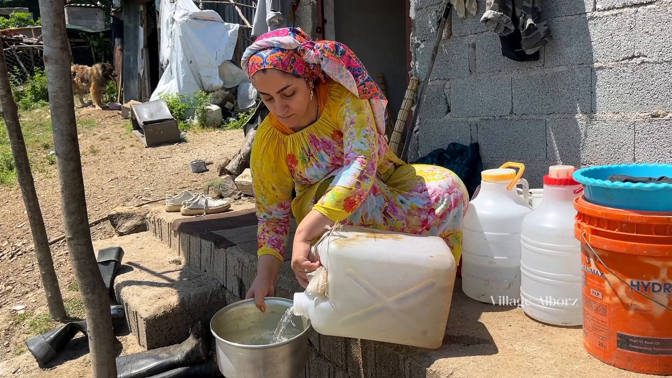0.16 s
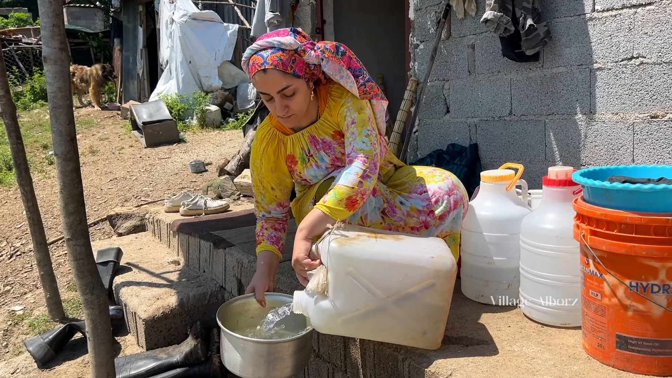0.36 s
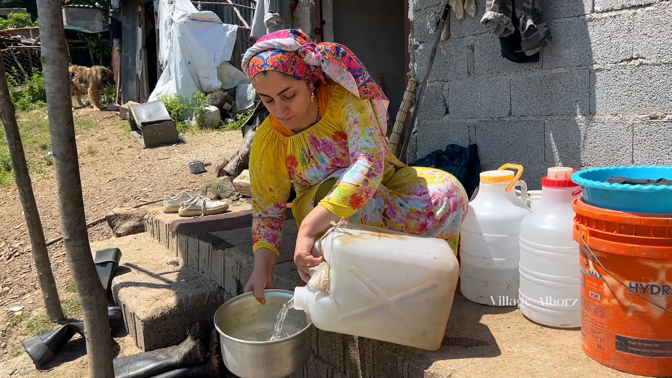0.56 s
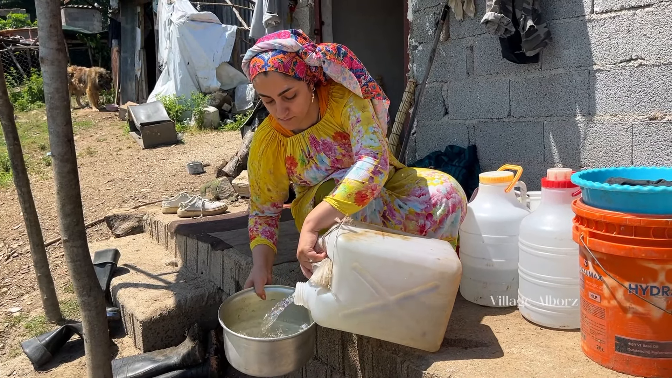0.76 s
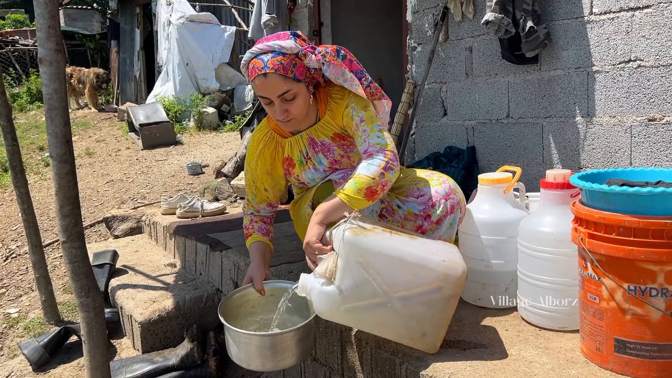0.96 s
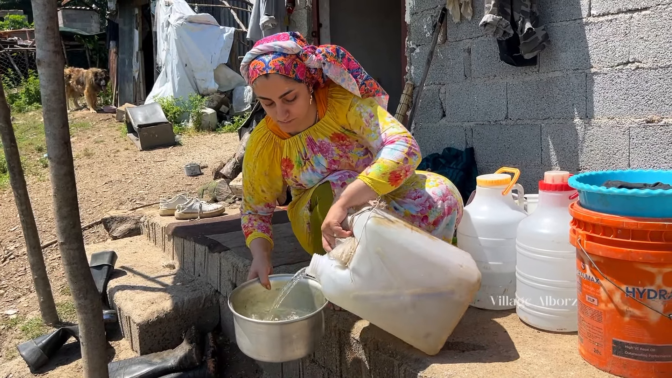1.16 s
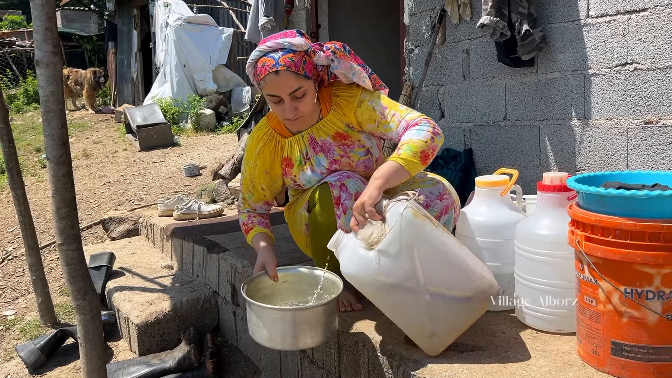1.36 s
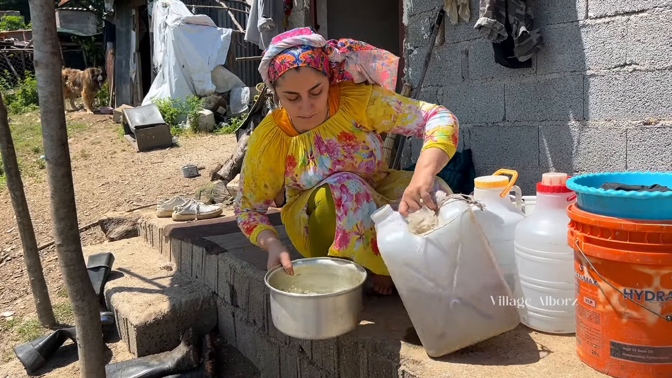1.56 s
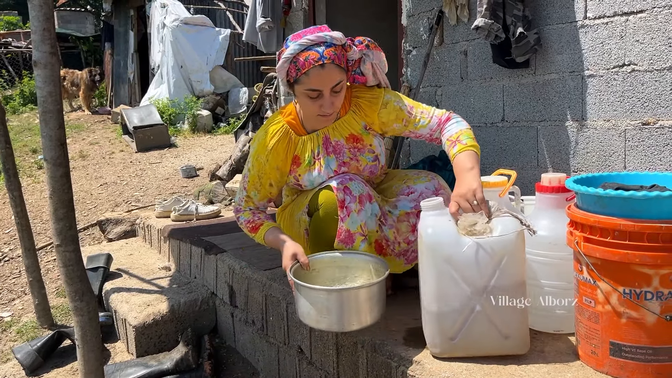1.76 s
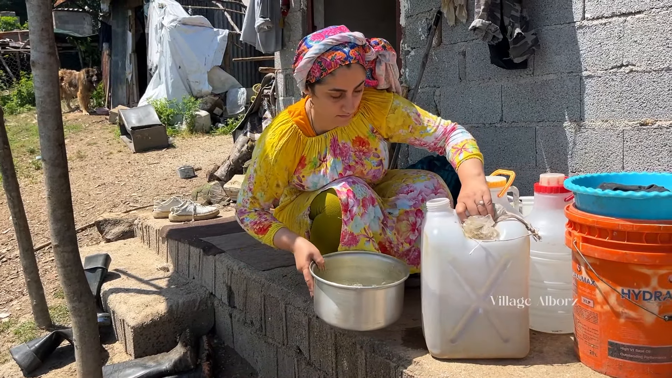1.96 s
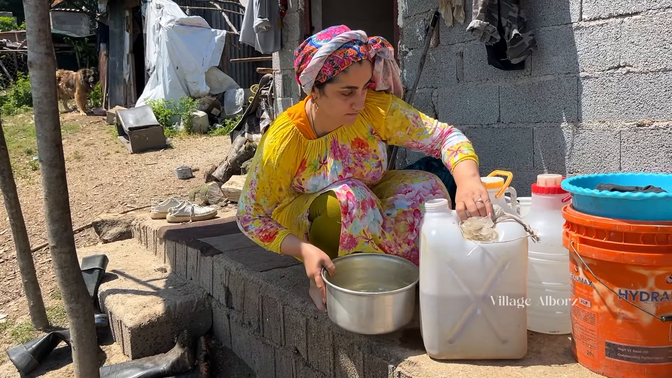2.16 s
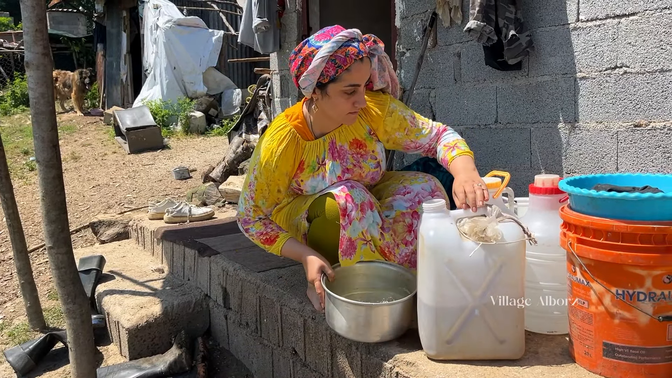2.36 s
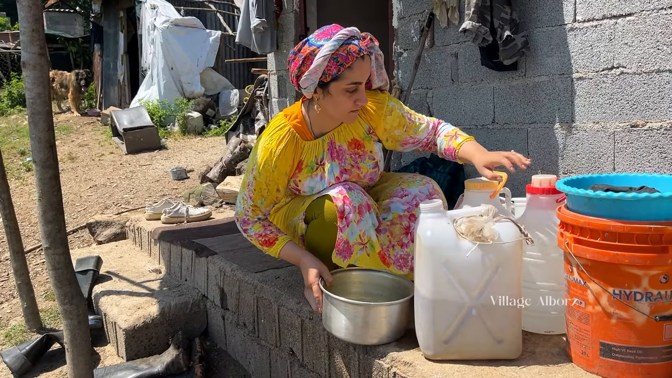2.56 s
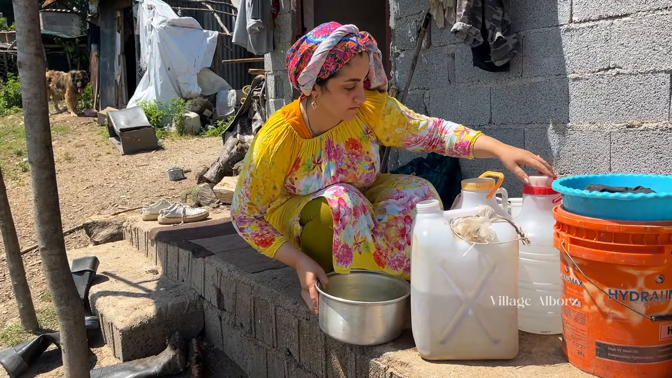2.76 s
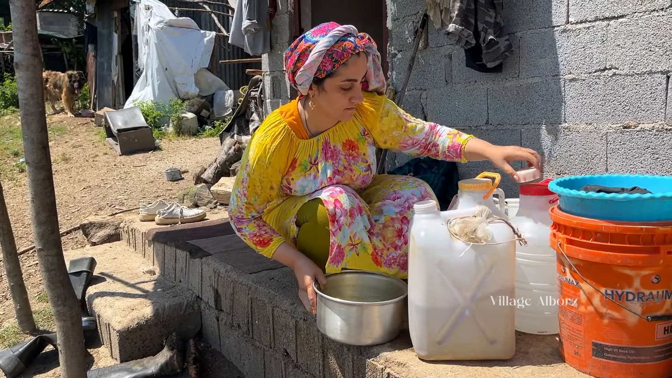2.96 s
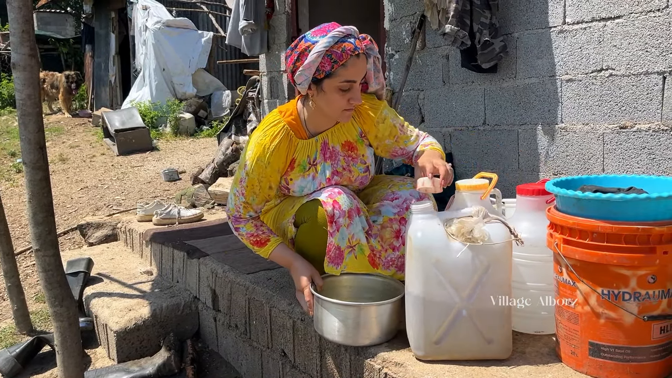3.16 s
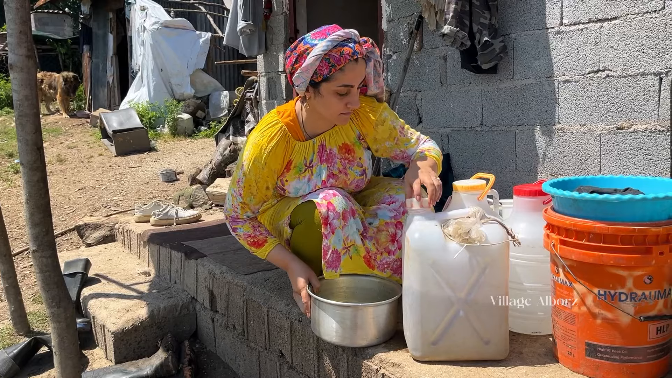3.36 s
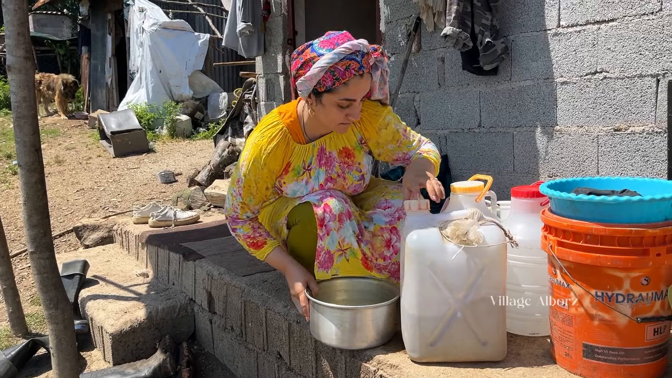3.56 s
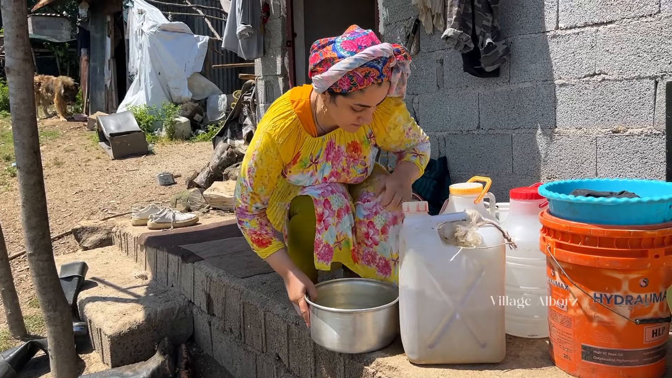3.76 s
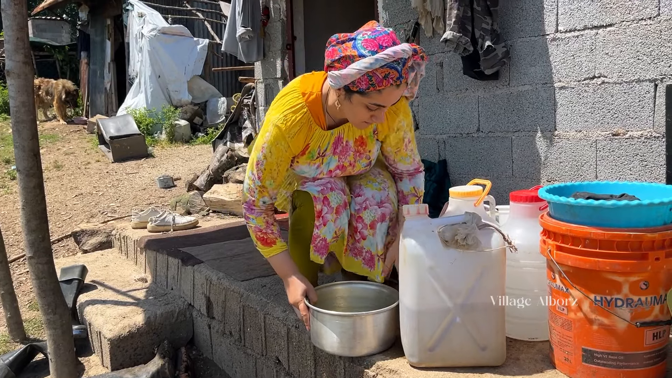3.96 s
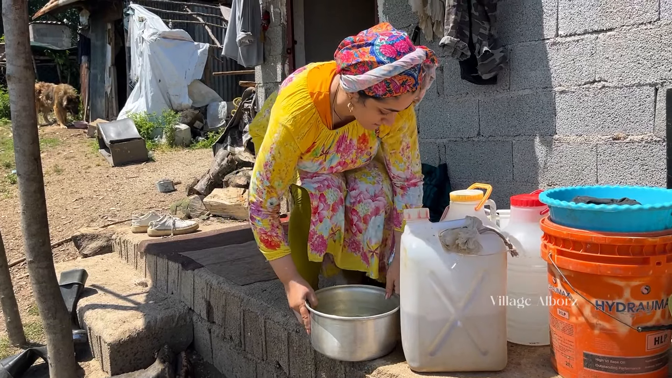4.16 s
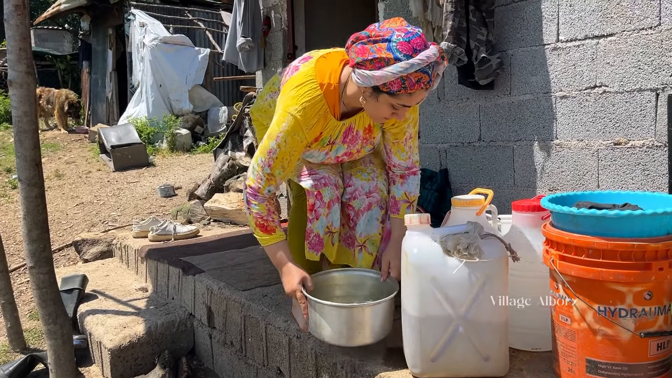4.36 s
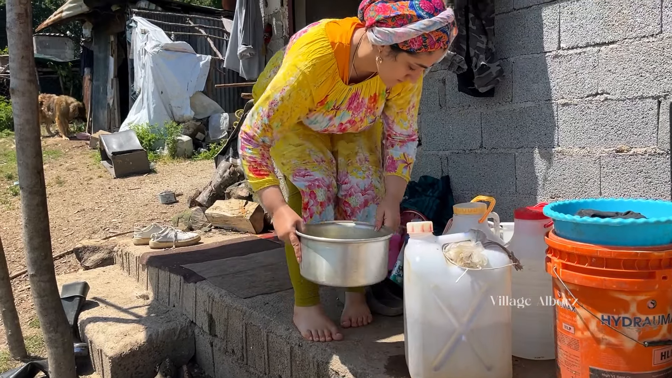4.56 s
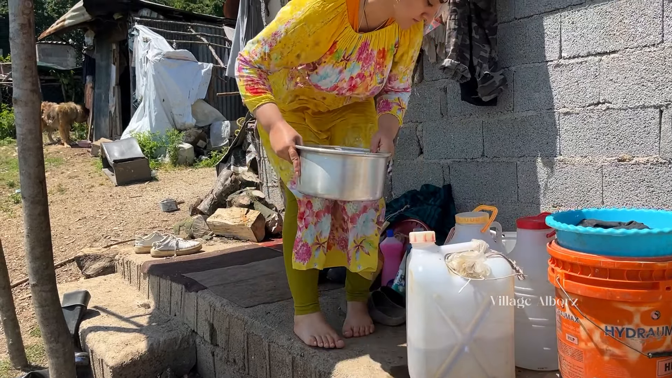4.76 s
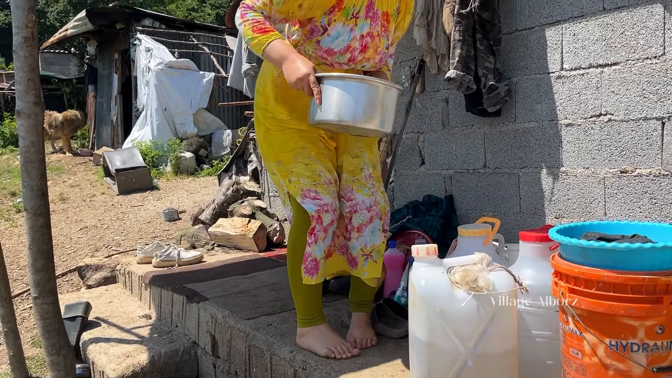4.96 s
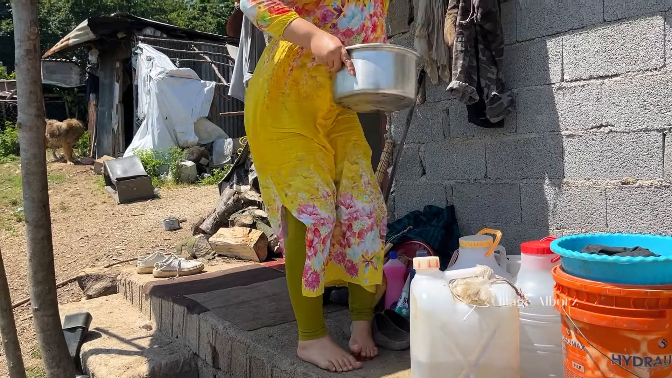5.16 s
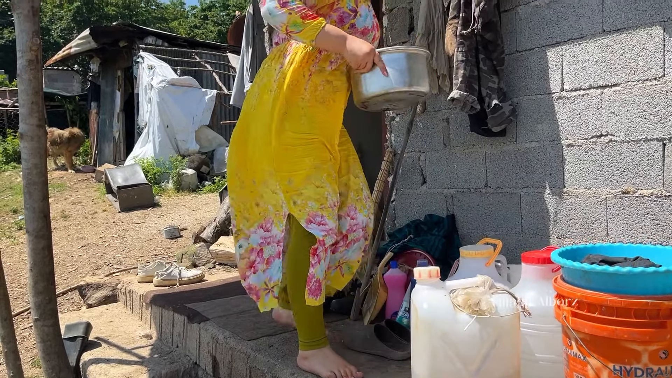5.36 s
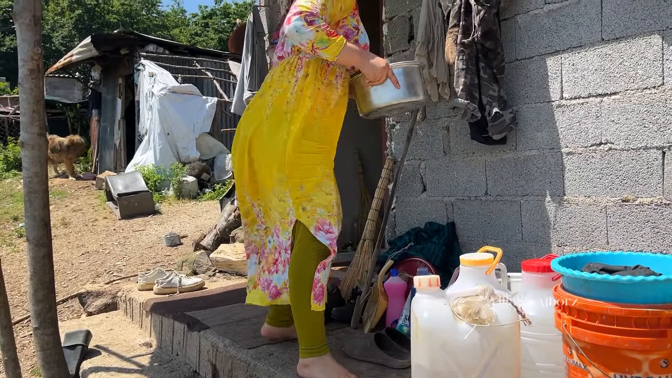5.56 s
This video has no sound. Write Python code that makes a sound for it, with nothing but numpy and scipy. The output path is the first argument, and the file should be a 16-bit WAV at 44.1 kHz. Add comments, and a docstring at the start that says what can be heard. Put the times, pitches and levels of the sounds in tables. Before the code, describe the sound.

Close stereo sound outside by a house wall. From the start, water gulps out of a plastic can into a part-filled metal pot in uneven gushes, with bubbling, bright spray, slaps and ringing plops; wind puffs thump the microphone, strongest in the first third of a second. The stream thins and stops around 1.6 s, just as a loud, hard plastic crack sounds with hollow booms. More dull booms come near 1.8 and 2.1 s, with light ticks and rustling. From about 2.2 s the pot scrapes over grit, landing at 2.46 s with a thud and short metallic ring. Water slops softly near 2.8 s. At 3.3 s a plastic cap clacks and scuffs on the neck, the can booming, with another light knock at 3.8 s. Cloth and bare feet then rustle quietly until 5.5 s, amid weak wind, distant insects, faint cricket trills and two tiny bird chirps near 5 s.

```python
"""On a doorstep, water runs from a plastic jerrycan into a metal pot, thins out and stops: swarms of gliding bubbles.
The can knocks and booms as decaying modes; the pot scrapes as resonant grit and is set down ringing; the cap clatters.
Cloth and bare feet rustle as filtered grains; wind is low noise with whirling puffs on the microphone.
Far off are insects as banded noise, a cricket as pulsed tones and a small bird as fluttering tones."""
import sys
import numpy as np
from scipy import signal
from scipy.fft import rfft, irfft, next_fast_len
from scipy.io import wavfile

SR = 44100
rng = np.random.default_rng(int(sys.argv[2]) if len(sys.argv) > 2 else 0)


def materialize(psi):
    """Save the field psi as 16-bit PCM at rate SR to the path in sys.argv[1].

    A 1-D psi becomes a single channel; in a 2-D psi each row is a channel.
    """
    bounded = np.clip(np.atleast_2d(psi).T, -1, 1)
    quanta = np.round(bounded * 32767).astype(np.int16)
    wavfile.write(sys.argv[1], SR, quanta)


N = 246958
T = np.arange(N) / SR

# Spectra of bubbles, fine droplets and spray. Each row: frequency in Hz, level in dB.
BUBBLE_COLOUR = [(250, 1), (600, -2), (950, -0.5), (1350, -10.5), (1800, -1.5), (2500, -14.5),
                 (3400, -10.5), (6000, -14.5)]
DROPLET_COLOUR = [(1500, -16), (2400, -5.5), (3400, -4.5), (5000, -10), (7000, -2), (11000, 1.5),
                  (15000, -22)]
SPRAY_COLOUR = [(400, -4), (1500, 5.5), (3400, -2), (5000, 1.5), (7000, 2.5), (11000, -6.5), (13500, -4),
                (16000, -32)]
# Resonances of the part-filled pot. Each row: starting pitch in Hz, width in Hz, level in dB.
POT_HOLLOW = [(690, 84, -20), (1120, 67, -8.5), (1880, 110, 8.5), (3286, 280, 8.5)]
HOLLOW_SAG_PER_S = 0.036  # share of pitch lost as the pot fills
# The can gulps air, so water comes in gushes, each landing with a slap. Each row: start in seconds,
# surge in dB, hold in seconds, slap level in dB, mist level in dB (both before the offsets in plops).
GUSHES = [(-0.004, 8.5, 0.15, -32, -66), (0.119, 14.5, 0.037, -54, -41), (0.207, 11, 0.023, -45, -45.5),
          (0.272, 7.5, 0.044, -31.5, -52), (0.412, 4, 0.0089, -57, -43.5), (0.478, 10.5, 0.063, -31, -62),
          (0.562, 11, 0.0088, -56, -44), (0.645, -5, 0.023, -46, -71), (0.716, 7, 0.14, -38.5, -69),
          (0.845, 2.5, .01, -27.5, -35.5), (0.864, 9.5, 0.014, -29, -41), (0.94, 11.5, 0.0094, -34, -35.5),
          (1.022, -2, 0.018, -48, -72), (1.112, 3, .01, -57, -56), (1.217, 10.5, 0.024, -35, -55),
          (1.336, 4, 0.14, -40, -51), (1.504, 5.5, 0.14, -38.5, -50)]
GUSH_ATTACK_S, GUSH_RELEASE_S = 0.031, 0.076
# The stream thins as the can is tipped back.
BUBBLING_DB, BUBBLING_FALL_DB_PER_S = -56.5, 6.5
SPRAY_DB, SPRAY_FALL_DB_PER_S = -62.5, 2
POUR_END_S = 1.6
RUSH_DB, FROTH_DB = -5.5, -7  # unpitched rush relative to bubbles; froth relative to a big one
SPRAY_SURGE_SHARE = 1
# Showers of drops falling back. Each row: start in seconds, level in dB, hold in seconds, pitch in Hz.
SPATTERS = [(.048, -54.5, 0.012, 6100), (0.074, -47.5, 0.0037, 3840), (.122, -64, 0.026, 3200),
            (0.213, -55.5, 0.032, 4460), (.505, -67, .05, 3800), (0.604, -65, 0.0089, 2170),
            (0.634, -60, 0.0094, 3880), (0.661, -54, 0.0054, 2940), (0.743, -59, 0.0094, 2950),
            (0.773, -60, 0.0068, 4500), (0.799, -55, 0.009, 2680), (0.829, -51, 0.0032, 3160),
            (0.874, -62, 0.0032, 3230), (0.912, -60, .008, 3170), (0.965, -56, .01, 3220),
            (1.021, -61, 0.0047, 3000), (1.107, -57, 0.0036, 5550), (1.238, -53, .005, 3760),
            (1.286, -58, .006, 3200), (1.475, -56, .003, 3480), (1.551, -66, .003, 3200)]
DROPS_PER_S, DROP_DB = 55, -53
# Biggest bubbles, from stream and sloshing. Each row: start in seconds, peak in dB, starting pitch in Hz.
PLOPS = [(.038, -36, 1854), (.073, -35.5, 1980), (0.088, -38.5, 4990), (.113, -37, 777),
         (0.145, -37.5, 3120), (.131, -45, 1900), (0.192, -37, 1826), (.207, -46, 3870),
         (.311, -43.5, 1014), (0.363, -32.5, 952), (.398, -46, 2630), (0.475, -37.5, 1860),
         (.508, -36, 613), (.568, -37, 3680), (.597, -44.5, 1830), (.662, -50, 1905), (0.705, -47.5, 980),
         (0.794, -44.5, 1035), (0.847, -33.5, 1764), (0.865, -36, 722), (0.867, -43.5, 424),
         (.868, -41, 3280), (.897, -41.5, 1830), (0.976, -41, 1750), (1.022, -43, 693), (1.042, -46, 1780),
         (1.046, -45, 480), (1.094, -43.5, 1897), (1.211, -37, 1680), (1.22, -37.5, 511),
         (1.239, -56, 3800), (1.284, -55, 2920), (1.335, -40.5, 660), (1.402, -48.5, 1860),
         (1.406, -46, 1140), (1.427, -47, 1106), (1.454, -38.5, 1450), (1.715, -51, 2210),
         (2.092, -47, 6660), (5.145, -60, 800), (5.157, -64, 1320), (5.18, -66, 1720), (5.195, -59, 2200)]
PLOP_T60_S, PLOP_T60_SLOPE = 0.057, 0.58  # ring time at 1 kHz; power of pitch by which it shortens

# Spectrum of the wind rumble. Each row: frequency in Hz, level in dB.
WIND_COLOUR = [(25, -4), (45, 8), (70, 8.5), (120, -1), (200, -6.5), (320, -13), (500, -24.5), (1000, -53)]
# Strongest puffs. Each row: centre in seconds, level in dB, length in seconds, nominal fastest eddy in Hz.
PUFFS = [(0.068, -16.5, 0.013, 345), (0.094, -25.5, 0.014, 175), (0.141, -26, .008, 250),
         (0.166, -17.5, .013, 339), (0.203, -39, .02, 298), (0.228, -29.5, 0.0064, 344),
         (0.259, -34.5, .018, 283), (0.279, -21, 0.0077, 370), (0.326, -23.5, 0.017, 332),
         (0.548, -35.5, 0.014, 193), (0.94, -36, 0.024, 76), (0.993, -29.5, 0.012, 222),
         (1.015, -29, 0.011, 237), (1.256, -44, 0.0074, 211), (1.374, -44, 0.021, 100),
         (2.07, -45.5, .025, 99), (2.6, -42, .025, 150), (2.856, -48, .025, 166), (2.998, -40, .008, 150),
         (3.053, -45, 0.022, 170), (3.274, -32.5, 0.016, 185), (3.421, -29.5, .016, 114.4),
         (3.447, -36, .007, 166), (3.486, -35.5, 0.0147, 147), (3.585, -39, .008, 200),
         (3.615, -28, 0.0097, 254), (3.651, -30, 0.0097, 236), (3.701, -36.5, .012, 233),
         (3.788, -50, .025, 254), (3.88, -35.5, .018, 121), (3.985, -34.5, .014, 106),
         (4.043, -46, .008, 184), (4.069, -38.5, 0.0154, 120), (4.163, -50, .03, 227),
         (4.415, -44, .012, 107), (4.527, -37, 0.016, 205), (4.556, -31, 0.0187, 115),
         (4.602, -41, .012, 79), (4.712, -49.5, .015, 109), (5.046, -43, .03, 62), (5.266, -47, .025, 89)]
# Gusts over the breeze. Each row: start in seconds, level in dB, hold in seconds.
GUSTS = [(0.045, -37, 0.34), (1.01, -51, 0.022), (2.628, -59.5, 0.36), (3.58, -50.5, 0.29),
         (4.543, -57.5, .01)]
GUST_ATTACK_S, GUST_RELEASE_S = 0.1, 0.065
BREEZE_DB, BREEZE_FALL_DB_PER_S = -50.5, 2.13
WIND_SIDE_DB, WIND_LUMP_DB = -15, 5  # part opposed between the ears; largest swing of the rumble

# Spectra of still air and far insects. Each row: frequency in Hz, level in dB.
AIR_COLOUR = [(100, 18), (250, 7), (500, -2), (950, -3.5), (1400, -11.5), (2500, -17), (3800, -21.5),
              (7000, -29.5), (12000, -24), (16000, -42.5)]
INSECT_COLOUR = [(3800, -22), (4400, -10), (4900, -1), (5400, 0), (5750, -3), (6200, -15), (7500, -30)]
AIR_DB, INSECT_DB = -65.5, -79.5

# Knocks on the plastic can. Each row: start in seconds, crack level in dB, crack tilt in dB per octave,
# clack level in dB, wall ring level in dB.
KNOCKS = [(1.6214, -13.5, 2, -28.5, -31), (1.821, -39.5, -14, -43.5, -73), (2.131, -31, -5.5, -37.5, -64),
          (2.883, -50.5, 16, -60, -67), (3.833, -39, 17, -59.5, -70)]
# Contact crack and plastic clack spectra. Each row: frequency in Hz, level in dB.
CRACK_COLOUR = [(1000, -1.5), (2200, -3), (3500, 3.5), (5200, 3.5), (7000, -1.5), (11000, -16),
                (16000, -20.5)]
CLACK_COLOUR = [(200, -55), (400, 7.5), (850, 8.5), (1300, 1.5), (2000, 5), (3000, -6), (6000, -19),
                (14000, -36)]
# The can's stiff wall. Each row: pitch in Hz before ringing() lowers it by 1 %, level in dB, t60 in seconds.
WALL_MODES = [(440, -7, .1), (795, -7, .1), (935, -10, .1), (1550, -10, .045), (1805, -6, .05),
              (2115, -4, .05), (2930, -3, .025), (3550, -4, .018), (4240, 0, .02), (4630, 0, .018),
              (5070, 1, .018), (5300, 3, .016), (5900, 0, .015)]
BEND_LAG_S = 0.007  # travel time of a 1 kHz bending wave across the wall
# Booms of the hollow can as it rocks, settles and is handled. Each row: start in seconds, peak in dB,
# starting pitch in Hz, share of the full ring time.
BOOMS = [(1.625, -31.5, 291.6, 0.95), (1.636, -33.5, 299.7, 0.31), (1.652, -31.5, 267, 0.74),
         (1.803, -36.5, 174.8, 0.98), (1.827, -25, 245, 0.73), (1.86, -35, 209, 0.76), (1.903, -37, 186, 1),
         (2.132, -33, 269, 0.7), (2.152, -32.5, 222, 1), (2.206, -43.5, 234.4, 0.95),
         (3.354, -26.5, 252.4, 0.54), (3.387, -29.5, 264, 0.93), (3.836, -36, 307.6, 0.84),
         (3.868, -42, 274, 1)]
# Boom modes. Each row: multiple of the boom pitch, level in dB, full t60 in seconds.
CAN_MODES = [(.52, -12, .16), (.72, -12.5, .2), (1, 0, .17), (1.25, -7, 0.092), (1.6, -11.5, 0.093)]
# Water swinging against the wall lowers and unsettles the boom; sag and waver are shares of pitch.
BOOM_SAG_PER_S, BOOM_WAVER, BOOM_FLUTTER_DB = 1, 0.13, 3.5

# Rubs of cloth, hands and feet. Each row: start in seconds, level in dB, hold in seconds,
# treble lift in dB, rasp level in dB.
RUBS = [(1.678, -61, 0.18, -4, -12.5), (1.873, -69.5, 0.55, 2.5, -7.5), (2.773, -69.5, 0.012, 3, -5),
        (2.829, -70.5, 0.089, -3, -16), (3.544, -66, 0.17, 2, -6), (3.583, -83.5, 0.038, -9, 7),
        (3.773, -67.5, 0.012, 8, -1), (3.841, -66, 0.016, 10.5, -7), (3.908, -67.5, 0.28, 0.5, -14),
        (4.203, -73, 0.0044, -10, 2), (4.215, -71, 0.18, -2.5, -6), (4.702, -67.5, 0.011, 3, -4),
        (4.73, -72.5, 0.088, 5, -5), (4.778, -79, 0.0044, 18.5, -5), (4.867, -78.5, 0.32, 1.5, -6.5),
        (4.953, -76.5, 0.0045, 1, 6), (5.173, -63.5, 0.03, 4, -4), (5.52, -69, 0.036, 0.5, -13.5)]
# Spectrum of the rubbing grains. Each row: frequency in Hz, level in dB.
RUSTLE_COLOUR = [(300, 18.5), (800, 7), (1400, 2), (1900, 2.5), (2800, 2), (4000, 3.5), (6000, 2),
                 (8000, 1), (11000, -1.5), (14000, -4), (16000, 2.5)]
# Resonances of catching skin and cloth. Each row: pitch in Hz, width in Hz, level in dB.
RASP_RESONANCES = [(1740, 33, 1.5), (1967, 80, 2.5), (2213, 140, -1.5), (2490, 200, -7.5),
                   (3116, 130, -5.5)]
RUB_ATTACK_S, RUB_RELEASE_S = 0.0037, 0.014
RUB_RELEASE_SHARE = 0.29  # share of the hold added to the release
RUB_TREBLE_HZ = 4440
# The plastic ticks while handled. Each row: start in seconds, length in seconds, level in dB.
HANDLING = [(1.74, .47, -45.5), (2.74, .34, -57.5), (3.68, .17, -45.5)]
TICKS_PER_S = 36
# Spectrum of those ticks. Each row: frequency in Hz, level in dB.
TICK_COLOUR = [(2500, -8), (6000, -17), (9500, 5), (12500, 3.5), (16000, -5)]

# The pot is dragged, fastest in mid-stroke, until it lands.
DRAG_START_S, DRAG_FASTEST_S, POT_DOWN_S = 2.15, 2.32, 2.4589
DRAG_DB, DRAG_RISE_DB_PER_S, DRAG_EASE_DB_PER_S, POT_DOWN_DB = -48, 68, 51, -30
# Above this pitch the grit hiss grows faster with speed: extra dB per dB of speed.
DRAG_HISS_HZ, DRAG_HISS_DB, DRAG_HISS_FOLLOWS = 6600, 5, 0.97
# Spectra of scrape, landing thud and weak wall modes. Each row: frequency in Hz, level in dB.
SCRAPE_COLOUR = [(200, 19.5), (900, -0.5), (1300, -1), (2000, -0.5), (2800, -2), (3800, 0), (6000, -6),
                 (11000, -9), (14500, -14), (16000, -15)]
POT_THUD_COLOUR = [(120, 10.5), (450, 0.5), (1000, 5), (1400, -8), (2200, -32), (3000, -11), (4000, -3),
                   (5500, -18.5), (14000, -35)]
POT_SHIMMER_COLOUR = [(500, 9), (1000, -6), (1400, -10), (2300, -7), (3000, -15), (4200, -14), (8000, -33)]
SHIMMER_DB = -17
# The pot's base, damped by the ground. Each row: pitch in Hz, width in Hz, level in dB.
BASE_RESONANCES = [(953, 55, 2), (1536, 52, 3), (2060, 90, 4), (3090, 73, 2), (3430, 250, -1),
                   (4120, 62, 2)]
# The pot's ringing wall. Each row: pitch in Hz, level in dB, t60 in seconds.
POT_MODES = [(218.6, -9, 0.43), (266, -8.5, 0.38), (298, -12, 0.42), (379, -9, 0.3), (435, -12, 0.14),
             (524, -2.5, 0.25), (595, -18, 0.28), (698, -21.5, 0.75), (850, -13, .28), (987, -13, .38),
             (1136, -28, .7), (1292, -20, .53), (1540, -32, .4), (1664, -10, .49), (1686, -20, .35),
             (1820, -30, .33), (1950, -19, .33), (2182, -13, .2), (2266, -14, .27), (2417, -13, .24),
             (2442, -19, .24), (2725, -15, .17), (3290, -20, .15), (3569, -24, .3), (3850, -19, .12),
             (3984, -24, .21), (4085, -15, .13), (3580, -12, 0.039)]
# The lowest modes start flat by this share and recover as the pot settles.
LOW_BEND, LOW_BEND_S, LOW_BEND_BELOW_HZ = 0.16, 0.032, 530
POT_WAVER, POT_FLUTTER_DB = 0.0025, 2  # share of pitch; level
# A wall mode pulled upward, ever faster, as the water swings away from it.
SLOSH_MODE_DB, SLOSH_MODE_HZ, SLOSH_MODE_RISE, SLOSH_S = -68, 2920, 0.05, 0.135
# Water slops on the pot's wall. Each row: start in seconds, level in dB, pitch in Hz.
SLOPS = [(2.783, -41.5, 613), (2.835, -48, 920)]
# Spectrum of a slop. Each row: multiple of its pitch, level in dB.
SLOP_COLOUR = [(.6, -6), (1, 7), (1.3, -14), (1.6, -7), (2.2, -24), (6, -33), (16, -38)]

# A cricket's trills swell and break off. Each row: end in seconds, level in dB.
TRILLS = [(2.92, -71), (4.69, -71), (5.137, -66.5), (5.53, -66.5)]
CRICKET_HZ, CRICKET_PULSES_PER_S, CRICKET_SWEEP_HZ, TRILL_SWELL_S = 5660, 98, 130, 0.085

# The cap on the can's neck. Each row: start in seconds, tick level in dB, clack level in dB,
# clack pitch in Hz before ringing() lowers it by 1 %.
CAP_HITS = [(3.2896, -36, -33.5, 1830), (3.291, -51, -36.5, 936), (3.298, -57, -38, 1940),
            (3.328, -42.5, -40.5, 930), (3.337, -55, -45, 1900), (3.3475, -30.5, -39, 1490),
            (3.35, -57, -44, 860), (3.361, -43, -43, 2600), (3.379, -35, -34, 960), (3.384, -42, -45, 880)]
# Cap modes. Each row: multiple of the clack pitch, level in dB, t60 in seconds.
CAP_MODES = [(.8, -6, 0.037), (1, -3.5, 0.042), (1.14, -5, 0.022), (1.75, -11, 0.022)]
# Spectra of the cap's tick and its scuff on the thread. Each row: frequency in Hz, level in dB.
CAP_TICK_COLOUR = [(700, -28), (1600, 7), (3500, 11.5), (5000, -2), (7000, 4.5), (11000, -2), (16000, -9)]
SCUFF_COLOUR = [(250, 11.5), (550, 0), (900, -2), (1300, -3), (1850, -9), (2800, -13.5), (4500, -20),
                (12000, -32)]
CAP_RATTLE_T60_S = 0.05
SCUFF_S, SCUFF_HOLD_S, SCUFF_DB = 3.3, 0.085, -49

# Calls of a far bird. Each row: centre in seconds, level in dB, pitch in Hz, length in seconds.
CHIRPS = [(4.895, -66, 6500, .016), (5.039, -73, 6570, .012)]
BIRD_WARBLE_HZ, BIRD_FLUTTER_DB = 120, 2

# Level between the ports. Each row: frequency in Hz, left minus right in dB.
BALANCE_DB = [(100, 3), (220, 1), (700, 3.5), (1300, 5.5), (2400, 1), (4600, 7), (8000, -5.5), (15000, 1.5)]
# Phase between the ports. Each row: frequency in Hz, left lead in radians.
PORT_PHASE_RAD = [(100, 0), (1100, 0), (1550, -1.1), (1800, 0), (3000, .9), (4700, .7), (6600, -1.4),
                  (7700, -2.7), (11200, -5.9), (15800, -9.5)]
CUTOFF_HZ = 15700


def from_db(db):
    """Decibels to gain."""
    return 10 ** (np.asarray(db) / 20)


def rms_one(x):
    """Scale to an rms of 1."""
    return x / np.sqrt(np.mean(x ** 2) + 1e-20)


def peak_one(x):
    """Scale to a peak of 1."""
    return x / (np.abs(x).max() + 1e-20)


def at_hz(points, hz):
    """Read a spectrum on a log-frequency axis."""
    point_hz, value = np.transpose(points)
    return np.interp(np.log(np.maximum(hz, 1)), np.log(point_hz), value)


def colour(x, points):
    """Causal minimum-phase filter with the given spectrum, falling away below its first point."""
    size = next_fast_len(len(x) + 4096)
    size += size % 2
    hz = np.maximum(np.arange(size // 2 + 1) * SR / size, 1)
    bass_fall = np.clip(hz / points[0][0], 0.03, 1) ** 2
    cepstrum = irfft(np.log(from_db(at_hz(points, hz)) * bass_fall))
    # Folding the cepstrum makes the phase minimum.
    cepstrum[1:size // 2] *= 2
    cepstrum[size // 2 + 1:] = 0
    return irfft(rfft(x, size) * np.exp(rfft(cepstrum)))[:len(x)]


def highpass(x, cut_hz):
    """Zero-phase treble, so that x minus treble leaves the rest."""
    return signal.sosfiltfilt(signal.butter(2, cut_hz, "high", fs=SR, output="sos"), x)


def drift(knots_per_s):
    """Random wander with an rms of 1, straight between knots."""
    knots = rng.standard_normal(8000)
    return rms_one(np.interp(T * knots_per_s, np.arange(len(knots)), knots))


def grains(per_s, spread_db):
    """Random clicks of uneven size and either sign."""
    sizes = from_db(spread_db * np.minimum(rng.exponential(1, N), 4))
    signed = sizes * rng.choice([-1, 1], N)
    return signed * (rng.random(N) < per_s / SR)


def resonate(x, hz, width_hz):
    """One two-pole resonance with a gain near 1 on top."""
    r = np.exp(-np.pi * width_hz / SR)
    zeros = np.array([1, 0, -1]) * (1 - r * r) / 2
    poles = [1, -2 * r * np.cos(2 * np.pi * hz / SR), r * r]
    return signal.lfilter(zeros, poles, x + 1e-18)


def fade(t, t60):
    """Exponential decay by 60 dB in t60 seconds."""
    return np.exp(-np.log(1000) * t / t60)


def onset(attack_s):
    """Exponential attack, a quarter of a second long."""
    return 1 - np.exp(-T[:SR // 4] / attack_s)


def swell(s, hold_s, attack_s, release_s):
    """Envelope that rises to 1 at time s, holds, then dies away."""
    before = np.maximum(s - T, 0) / attack_s
    after = np.maximum(T - s - hold_s, 0) / release_s
    return np.exp(-before ** 2 - after)


def ringing(modes, t, speed=0.99):
    """Struck modes as decaying sines of random sign; speed multiplies their pitch."""
    bent_t = np.cumsum(speed * np.ones(len(t))) / SR
    signs = rng.choice([-1, 1], len(modes))
    out = np.zeros(len(t))
    for sign, (hz, db, t60) in zip(signs, modes):
        out += sign * from_db(db) * np.sin(2 * np.pi * hz * bent_t) * fade(t, t60)
    return out


def burst(points, t60, attack_s=0.00062):
    """Coloured noise that starts fast and dies; its rms is half that of the bare decay."""
    t = T[:SR // 4]
    x = colour(rng.standard_normal(len(t)) * fade(t, t60) * onset(attack_s), points)
    return rms_one(x) * np.sqrt(np.mean(fade(t, t60) ** 2)) / 2


def add(out, s, x):
    """Mix a short sound in at time s."""
    start = max(round(s * SR), 0)
    out[start:start + len(x)] += x[:N - start]


def bubble(hz, t60, rise):
    """A trapped bubble rings, and climbs in pitch as it nears the surface."""
    t = T[:int(t60 * SR) + 2]
    return np.sin(2 * np.pi * hz * t * (1 + rise * t / t60 / 2)) * fade(t, t60)


def swarm(count, low_hz, high_hz, cycles, rise, size_db):
    """Bubbles of uneven size, born at random while the water runs."""
    out = np.zeros(N)
    for when, pitch, size, life in rng.random((count, 4)):
        hz = low_hz * (high_hz / low_hz) ** pitch
        gain = from_db(size_db * min(-np.log(1 - size), 3)) * hz ** 0.063
        add(out, when * POUR_END_S, gain * bubble(hz, cycles * (0.5 + life) / hz, rise))
    return out


def while_pouring(x):
    """Scale to a spread of 1 over the pour."""
    return x / x[T < POUR_END_S].std()


def sinking_resonance(x, hz, width_hz):
    """A resonance, gain 1 on top, that sinks as the pot fills: shift to 0 Hz, smooth, shift back."""
    sinking_hz = hz * (1 - HOLLOW_SAG_PER_S * np.minimum(T, POUR_END_S))
    turn = np.exp(2j * np.pi * np.cumsum(sinking_hz) / SR)
    r = np.exp(-np.pi * width_hz / SR)
    return 2 * np.real(turn * signal.lfilter([1 - r], [1, -r], x / turn + 1e-18))


def pour(gush_db=3.0, bubbles_db=0.0, crackle_db=-4.0):
    """A dense wash of bubbles sounds through the pot's hollow, under fine droplets and spray."""
    big = swarm(count=1500, low_hz=400, high_hz=4500, cycles=28, rise=0.1, size_db=3.4)
    rush = grains(9000, spread_db=2.5)
    churn = from_db(bubbles_db) * while_pouring(colour(big, BUBBLE_COLOUR))
    churn = churn + from_db(RUSH_DB) * while_pouring(colour(rush, BUBBLE_COLOUR))
    hollow = sum(from_db(db) * sinking_resonance(churn, hz, width) for hz, width, db in POT_HOLLOW)
    churn = while_pouring(churn + hollow)

    droplets = swarm(count=3000, low_hz=1800, high_hz=14000, cycles=70, rise=0.03, size_db=4.4)
    crackle = while_pouring(colour(grains(7000, spread_db=4.0), SPRAY_COLOUR))
    spray = while_pouring(colour(droplets, DROPLET_COLOUR)) + from_db(crackle_db) * crackle
    spray = while_pouring(spray)

    surges_db = [db * swell(s, hold, GUSH_ATTACK_S, GUSH_RELEASE_S) for s, db, hold, _, _ in GUSHES]
    surge_db = np.max(surges_db, axis=0)
    churn_db = BUBBLING_DB - BUBBLING_FALL_DB_PER_S * T + surge_db + gush_db * drift(35.61)
    spray_db = SPRAY_DB - SPRAY_FALL_DB_PER_S * T + SPRAY_SURGE_SHARE * surge_db + gush_db * drift(50.28)
    running = swell(0, POUR_END_S, GUSH_ATTACK_S, GUSH_RELEASE_S)
    return running * (churn * from_db(churn_db) + spray * from_db(spray_db))


def spatters(width_share=0.97, attack_s=0.003, release_s=0.0031):
    """Thrown-up water falls back in short showers of tiny bubbles, each with its own size of drop."""
    fizz = swarm(count=4500, low_hz=1400, high_hz=8000, cycles=30, rise=0.06, size_db=3.0)
    out = np.zeros(N)
    for s, db, hold, hz in SPATTERS:
        shower = resonate(resonate(fizz, hz, width_share * hz), hz, width_share * hz)
        out += from_db(db) * swell(s, hold, attack_s, release_s) * while_pouring(shower)
    return out


def drops():
    """Stray drops tick sharply on the bare wall, weaker as the stream thins."""
    hits = grains(DROPS_PER_S, spread_db=2.0) * (T < POUR_END_S)
    return from_db(DROP_DB - SPRAY_FALL_DB_PER_S * T) * colour(hits, SPRAY_COLOUR)


def plops(rise=0.097, splat_db=-7.5, mist_db=2.5):
    """Big ringing bubbles with froth, and noisy slaps with mist, stand out of the stream."""
    out = np.zeros(N)
    for s, db, hz in PLOPS:
        t60 = PLOP_T60_S * (1000 / hz) ** PLOP_T60_SLOPE
        froth_colour = [(hz / 2, -8), (hz, 0), (hz * 2, -12), (hz * 10, -40)]
        add(out, s, from_db(db) * bubble(hz, t60, rise))
        add(out, s, from_db(db + FROTH_DB) * burst(froth_colour, t60=0.037))
    slap_colour = [(500, -71.5), (1800, 5.0), (3400, 15.0), (7000, -4.0), (14000, -33.0)]
    mist_colour = [(4000, -15.0), (10500, 8.0), (16000, -14)]
    for s, _, _, slap_level_db, mist_level_db in GUSHES:
        add(out, s, from_db(slap_level_db + splat_db) * burst(slap_colour, t60=0.041))
        add(out, s, from_db(mist_level_db + mist_db) * burst(mist_colour, t60=0.03))
    return out


def wind(slowest_hz=42, top_hz=450):
    """A lumpy rumble with sudden puffs, whose eddies turn faster the harder they blow."""
    gusts = sum(from_db(db) * swell(s, hold, GUST_ATTACK_S, GUST_RELEASE_S) for s, db, hold in GUSTS)
    blowing = from_db(BREEZE_DB - BREEZE_FALL_DB_PER_S * T) + gusts
    lumps = from_db(WIND_LUMP_DB * np.tanh(drift(20)))
    rumble = lumps * blowing * rms_one(colour(rng.standard_normal(N), WIND_COLOUR))
    puffs = np.zeros(N)
    whirl = np.clip(0.95 + 0.25 * drift(450), 0.3, 1.4)  # uneven turning speed
    for s, db, length, hz in PUFFS:
        near = np.abs(T - s) < 0.12
        blow = (1 + ((T[near] - s) / length) ** 2) ** -1.5
        turns = np.cumsum((slowest_hz + (hz - slowest_hz) * blow) * whirl[near]) / SR
        # Large eddies turn half as fast.
        small, large = np.sin(2 * np.pi * (np.outer([1, 0.5], turns) + rng.random((2, 1))))
        puffs[near] += from_db(db) * blow * (small + large) / np.sqrt(2)
    return rumble + signal.sosfilt(signal.butter(2, top_hz, fs=SR, output="sos"), puffs)


def air_and_insects():
    """Still air and a slowly wavering far band of insects, both coloured noise."""
    air = from_db(AIR_DB) * rms_one(colour(rng.standard_normal(N), AIR_COLOUR))
    insects = rms_one(colour(rng.standard_normal(N), INSECT_COLOUR))
    return air + from_db(INSECT_DB + drift(12)) * insects


def through_wall(x):
    """Low bending waves travel more slowly than high ones, so a knock sweeps downward."""
    step_hz = SR / len(x)
    slowness = np.sqrt(1000 / np.maximum(np.arange(len(x) // 2 + 1) * step_hz, 200))
    delay_s = BEND_LAG_S * (slowness - slowness[-1])
    return irfft(rfft(x) * np.exp(-2j * np.pi * np.cumsum(delay_s) * step_hz), len(x))


def knocks(crack_t60=0.016, clack_t60=0.096, rattle_db=-5.0):
    """A hard crack at the contact, then a clack and a brief ring that spread through the plastic wall."""
    out = np.zeros(N)
    for s, crack_db, tilt_db, clack_db, ring_db in KNOCKS:
        crack_colour = [(hz, db + tilt_db * np.log2(hz)) for hz, db in CRACK_COLOUR]
        add(out, s, from_db(crack_db) * burst(crack_colour, crack_t60))
        clack = burst(CLACK_COLOUR, clack_t60)
        chatter_db = rattle_db * np.tanh(drift(160)[:len(clack)])
        add(out, s, through_wall(from_db(clack_db + chatter_db) * clack))
        ring = ringing(WALL_MODES, T[:SR // 4]) * onset(0.00063)
        add(out, s, through_wall(from_db(ring_db) * ring))
    return out


def booms(swell_s=0.0017):
    """Each jolt swells the air and walls of the can into a short, unsteady boom."""
    out, t = np.zeros(N), T[:SR // 4]
    for s, db, hz, share in BOOMS:
        modes = [(multiple * hz, mode_db, t60 * share) for multiple, mode_db, t60 in CAN_MODES]
        speed = 1 - BOOM_SAG_PER_S * t + BOOM_WAVER * drift(70)[:len(t)]
        flutter = from_db(BOOM_FLUTTER_DB * drift(86)[:len(t)])
        boom = ringing(modes, t, speed) * flutter * onset(swell_s) ** 2
        add(out, s, from_db(db) * peak_one(boom))
    return out


def rustle(flutter_db=2.5):
    """Cloth and skin rub in fine grains, one swell a movement, with its own treble and resonant rasp."""
    grain = from_db(flutter_db * drift(45)) * rms_one(colour(grains(5000, spread_db=0.5), RUSTLE_COLOUR))
    treble = highpass(grain, RUB_TREBLE_HZ)
    catches = grains(900, spread_db=2.5)
    rasp = rms_one(sum(from_db(db) * resonate(catches, hz, width) for hz, width, db in RASP_RESONANCES))
    out = np.zeros(N)
    for s, db, hold, lift_db, rasp_db in RUBS:
        release_s = RUB_RELEASE_S + RUB_RELEASE_SHARE * hold
        rub = grain - treble + from_db(lift_db) * treble + from_db(rasp_db) * rasp
        out += from_db(db) * swell(s, hold, RUB_ATTACK_S, release_s) * rub
    return out


def ticks():
    """Sparse, thin ticks of plastic under the fingers."""
    held = sum(from_db(db) * (T > s) * (T < s + length) for s, length, db in HANDLING)
    return colour(held * grains(TICKS_PER_S, spread_db=3.0), TICK_COLOUR)


def scrape(judder_db=-3.2):
    """Grit grinds under the pot and excites its base, brightest at full speed."""
    rising_db = DRAG_RISE_DB_PER_S * (T - DRAG_FASTEST_S)
    easing_db = DRAG_EASE_DB_PER_S * (DRAG_FASTEST_S - T)
    speed_db = np.minimum(rising_db, easing_db)
    dragging = (T > DRAG_START_S) * (T < POT_DOWN_S)
    drag = from_db(DRAG_DB + speed_db + judder_db * drift(70)) * dragging
    grit = colour(grains(6000, spread_db=1.5), SCRAPE_COLOUR)
    base = sum(from_db(db) * resonate(grit, hz, width) for hz, width, db in BASE_RESONANCES)
    grit = rms_one(grit + base)
    hiss = highpass(grit, DRAG_HISS_HZ)
    return drag * (grit - hiss + hiss * from_db(DRAG_HISS_DB + DRAG_HISS_FOLLOWS * speed_db))


def pot_ring(shimmer_t60=0.59):
    """The wall rings, every mode ruffled in its own way by the shaken water, over a wash of weak modes."""
    t, out = T[:SR], np.zeros(SR)
    for hz, db, t60 in POT_MODES:
        flat = LOW_BEND * (hz < LOW_BEND_BELOW_HZ) * np.exp(-t / LOW_BEND_S)
        speed = 1 + POT_WAVER * drift(32)[:SR] - flat
        out += ringing([(hz, db, t60)], t, speed) * from_db(POT_FLUTTER_DB * drift(64.6)[:SR])
    add(out, 0, from_db(SHIMMER_DB) * burst(POT_SHIMMER_COLOUR, shimmer_t60))
    glide_hz = SLOSH_MODE_HZ * (1 + SLOSH_MODE_RISE * np.minimum(t / SLOSH_S, 2) ** 3)
    slosh = np.sin(2 * np.pi * np.cumsum(glide_hz) / SR) * swell(0, SLOSH_S, 0.01, 0.014)[:SR]
    return from_db(POT_DOWN_DB) * out + from_db(SLOSH_MODE_DB) * slosh


def pot(thud_db=2.0):
    """The pot scrapes along, then lands with a noisy thud and rings."""
    out = scrape()
    add(out, POT_DOWN_S, pot_ring())
    add(out, POT_DOWN_S, from_db(POT_DOWN_DB + thud_db) * burst(POT_THUD_COLOUR, t60=0.13))
    return out


def slops(t60=0.07):
    """Short, dull slaps of the water in the standing pot."""
    out = np.zeros(N)
    for s, db, hz in SLOPS:
        slop_colour = [(multiple * hz, level_db) for multiple, level_db in SLOP_COLOUR]
        add(out, s, from_db(db) * burst(slop_colour, t60, attack_s=0.0036))
    return out


def cricket():
    """Each wing stroke is a short pulse of falling pitch."""
    stroke = (CRICKET_PULSES_PER_S * T) % 1
    pitch_hz = CRICKET_HZ + CRICKET_SWEEP_HZ * (1 - 2 * stroke + drift(300) / 2)
    tone = np.sin(2 * np.pi * np.cumsum(pitch_hz) / SR)
    trills = sum(from_db(db) * swell(s, 0, TRILL_SWELL_S, 0.003) for s, db in TRILLS)
    return tone * np.sin(np.pi * stroke) ** 4 * trills


def cap(tick_t60=0.019, rattle_db=-8):
    """The cap hits the neck in uneven clacks, each at its own pitch, and scuffs along the thread."""
    scuff = rms_one(colour(grains(1500, spread_db=3.0), SCUFF_COLOUR))
    out = from_db(SCUFF_DB) * swell(SCUFF_S, SCUFF_HOLD_S, 0.014, 0.022) * scuff
    for s, tick_db, clack_db, hz in CAP_HITS:
        modes = [(multiple * hz, db, t60) for multiple, db, t60 in CAP_MODES]
        add(out, s, from_db(tick_db) * burst(CAP_TICK_COLOUR, tick_t60, attack_s=0.001))
        add(out, s, from_db(clack_db) * peak_one(ringing(modes, T[:SR // 4]) * onset(0.0007)))
        add(out, s, from_db(clack_db + rattle_db) * burst(CLACK_COLOUR, CAP_RATTLE_T60_S))
    return out


def bird():
    """Two thin calls, sines with fluttering pitch and level."""
    warble_hz = BIRD_WARBLE_HZ * drift(500)
    flutter = from_db(BIRD_FLUTTER_DB * drift(200))
    out = np.zeros(N)
    for s, db, hz, length in CHIRPS:
        tone = np.sin(2 * np.pi * np.cumsum(hz + warble_hz) / SR)
        out += from_db(db) * swell(s, 0, length, length / 2) * tone
    return flutter * out


def yard(side_db=-0.5):
    """Wide air and insects, with a cricket and a small bird in the middle."""
    mid, side = air_and_insects(), air_and_insects()
    return mid + bird() + cricket() + from_db(side_db) * side * np.array([[1], [-1]])


def ports(x):
    """Two microphone ports hear a near source with their own level and phase."""
    size = next_fast_len(N + SR // 10)
    hz = np.arange(size // 2 + 1) * SR / size
    spectrum = rfft(x, size)
    half_db, half_phase = at_hz(BALANCE_DB, hz) / 2, at_hz(PORT_PHASE_RAD, hz) / 2
    ears = []
    for sign in (1, -1):
        response = from_db(sign * half_db) * np.exp(1j * sign * half_phase)
        ears.append(irfft(spectrum * response, size)[:N])
    return np.array(ears)


def wall(x, t60=0.094, gap_s=0.00086):
    """Short scatter from house wall and step, different in each ear; long waves are hardly scattered."""
    t = T[:SR // 3]
    scatter = rng.standard_normal((2, len(t))) * fade(t, t60) * (t > gap_s)
    scatter = signal.sosfilt(signal.butter(2, 550, "high", fs=SR, output="sos"), scatter)
    scatter = scatter / np.sqrt(np.sum(scatter[0] ** 2))
    return signal.fftconvolve(x[None], scatter, axes=1)[:, :N]


def scene(wall_db=-10.0):
    """Near sounds with their scatter, the wind, and the yard behind."""
    water = pour() + spatters() + drops() + plops() + slops()
    can = knocks() + booms() + cap() + ticks()
    near = water + can + pot() + rustle()
    gusts = wind() + from_db(WIND_SIDE_DB) * wind() * np.array([[1], [-1]])
    return ports(near) + from_db(wall_db) * wall(near) + gusts + yard()


def record(dry, dip_hz=8300, dip_width_hz=1800, low_cut_hz=40):
    """What both microphone ports share has a deep treble dip; the deepest bass and the top are cut."""
    dipped = dry - resonate(dry.mean(axis=0), dip_hz, dip_width_hz)
    dipped = signal.sosfilt(signal.butter(2, low_cut_hz, "high", fs=SR, output="sos"), dipped)
    return signal.sosfilt(signal.ellip(10, 0.1, 80, CUTOFF_HZ, fs=SR, output="sos"), dipped)


dry = scene()
out = record(dry)
materialize(out)
```